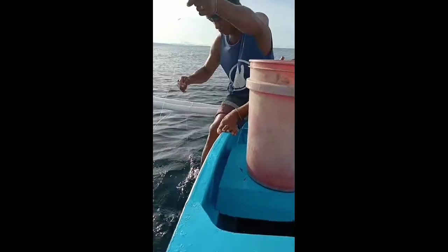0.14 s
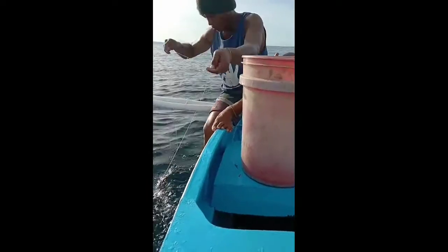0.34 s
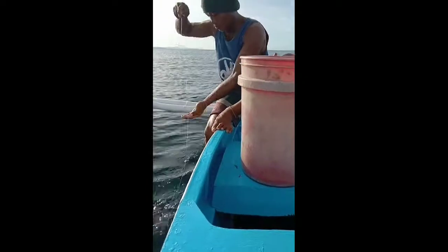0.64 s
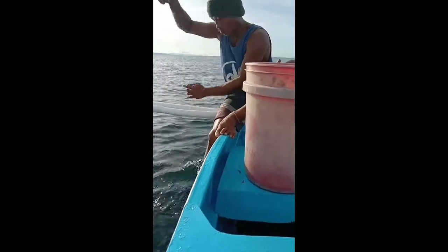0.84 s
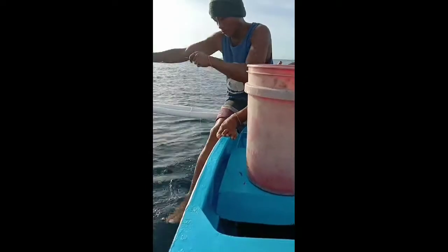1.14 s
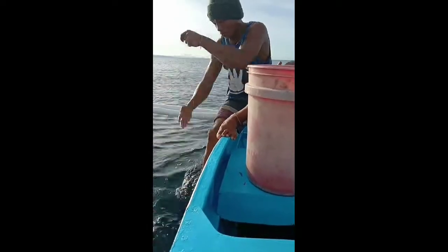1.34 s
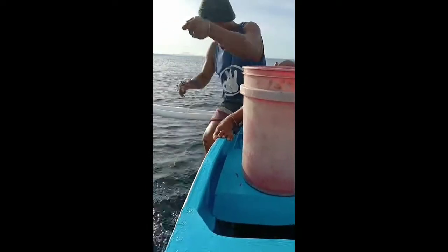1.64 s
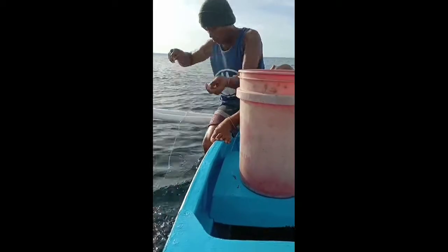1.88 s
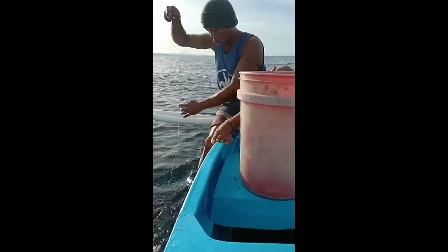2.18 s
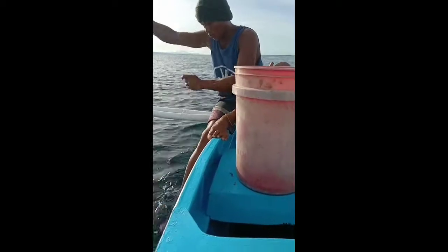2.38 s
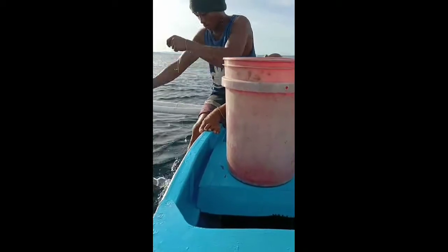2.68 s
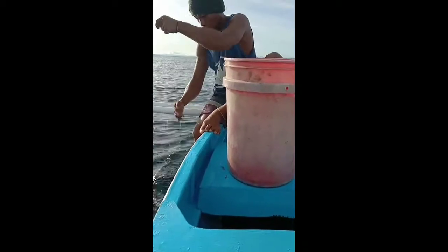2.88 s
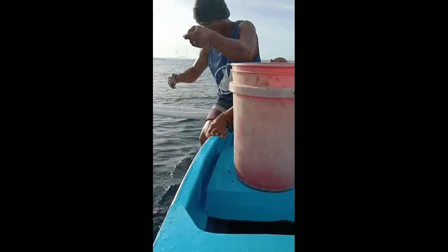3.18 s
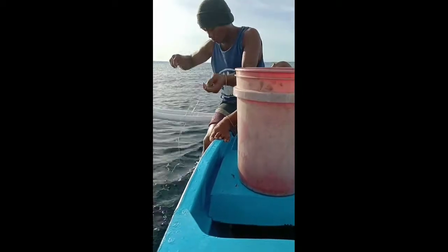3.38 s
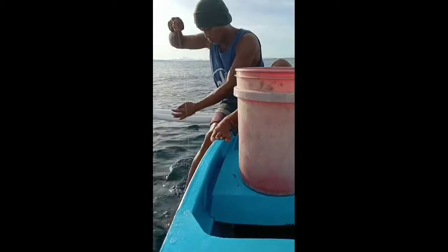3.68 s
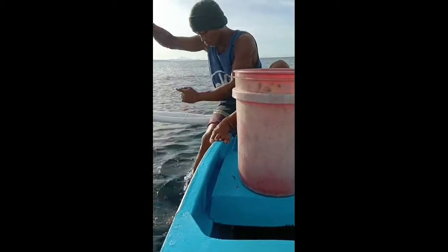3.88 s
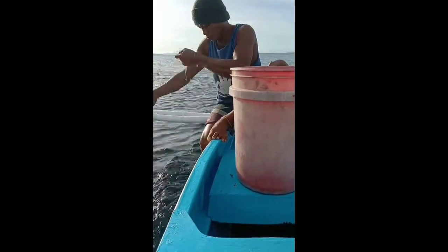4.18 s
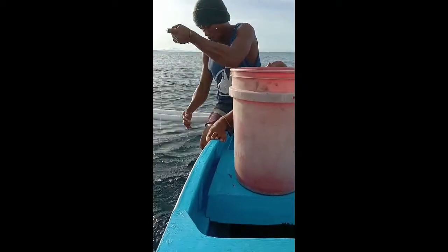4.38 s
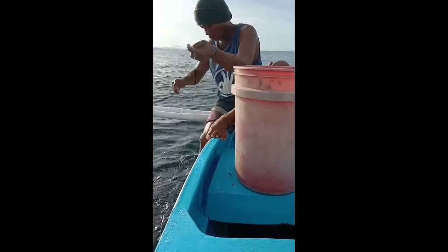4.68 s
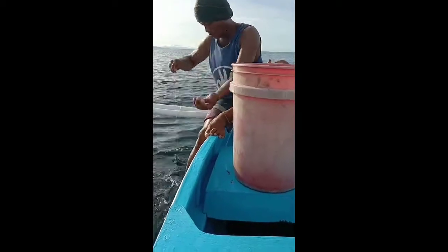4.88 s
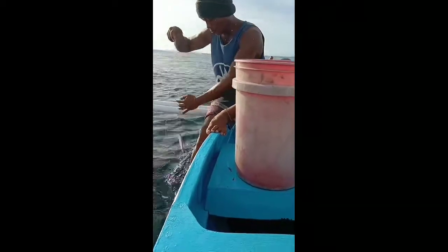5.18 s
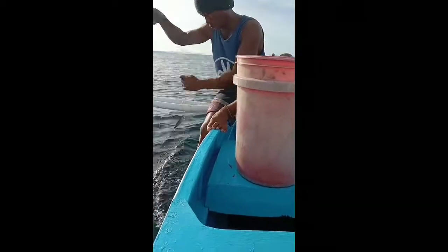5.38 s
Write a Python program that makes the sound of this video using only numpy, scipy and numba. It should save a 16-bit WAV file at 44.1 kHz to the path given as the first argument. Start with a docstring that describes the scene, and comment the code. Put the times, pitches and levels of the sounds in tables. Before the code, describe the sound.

Close on board a small boat in choppy sea. From 0 to 0.45 s come the loudest sounds: deep, round gulps around 200-250 Hz, a volley of wet slaps and a sharp, bright drip near 0.24 s. Low slosh, bubbly wash and fine fizz follow in short irregular surges, with a slap near 0.9 s and several softer, lower gulps from 1.2 to 2 s. A small fluttering glug slides upward near 2.4 s, then strong gulps and slaps cluster at 2.5-2.7 s. Another gulp at 3.0 s leads to a heavy slosh around 3.6 s, then distinct blows at 4.2 and 4.5 s amid quieter wash. A second rising glug comes near 5 s; strong gulps and slaps return from 5.1 s to the end. Tiny ticks and drips dot everything. The hull rings briefly, deck reflections die quickly, and a faint sea rumble continues underneath.

```python
"""A small outrigger boat in a choppy sea, heard from on board: bubble clouds slosh, filtered noise rumbles.
At once come the loudest gulps (swelling, rising sines), slaps (volleys of impacts) and sharp drips (dying sines).
Surges of bubbly wash and fizz (bubbles and flickering noise) and fine ticks (bursts of impacts) follow;
more gulps and slaps come between them. Near 2.4 s and 5 s a glug (fluttering sine) slides up.
Strong gulps return from 5.1 s to the end; hull modes and a short scatter on deck colour the surface sounds."""
import sys
import numpy as np
from scipy import signal
from scipy.fft import rfft, irfft, next_fast_len
from scipy.io import wavfile
from scipy.ndimage import uniform_filter1d
from numba import njit

SR = 44100
rng = np.random.default_rng(int(sys.argv[2]) if len(sys.argv) > 2 else 0)


def materialize(psi):
    """Save the field psi as 16-bit PCM at rate SR to the path in sys.argv[1].

    A 1-D psi becomes a single channel; in a 2-D psi each row is a channel.
    """
    bounded = np.clip(np.atleast_2d(psi).T, -1, 1)
    quanta = np.round(bounded * 32767).astype(np.int16)
    wavfile.write(sys.argv[1], SR, quanta)


N = 243873
TIME_S = np.arange(N) / SR

# Noise and bubble colours. Each row: frequency in Hz, relative level in dB.
SEA_COLOUR = [(25, -43), (100, 62.5), (250, 52), (400, -37.5), (1200, -25), (2500, -64), (4500, -51),
              (8000, -12.5), (15500, -35)]
SLOSH_COLOUR = [(45, -12), (58, -16), (75, -8), (102, 1), (150, -3.5), (220, -4)]
GURGLE_COLOUR = [(230, 14.5), (300, 23.5), (400, -49), (560, 8), (680, -6.5), (830, -12.5)]
WASH_COLOUR = [(500, -30), (580, -8.5), (680, -26.5), (820, -0.5), (960, -8.5), (1180, 0.5), (1600, 3),
               (2050, -3.5), (2500, -1), (2900, -12)]
FIZZ_COLOUR = [(2800, -26.5), (3400, 14.5), (4500, 12), (5800, 1), (7800, 8), (9000, 1), (12000, -10),
               (15500, 7.5)]
SPRAY_COLOUR = [(300, -58), (1000, -18.5), (2000, 2.5), (2600, -5), (4300, 4.5), (6000, -8.5), (7900, -1.5),
                (9500, -19.5), (15500, -23)]
TICK_COLOUR = [(1000, -47), (4000, -4), (8000, -3), (11000, -4.5), (13500, -8), (15500, -4.5)]
KNOCK_COLOUR = [(60, -57.5), (220, 12), (350, 0.5), (450, -9), (570, -1), (700, -13), (850, -0.5),
                (1020, -8.5), (1250, -4.5), (1750, -3.5), (2050, -14), (2500, -7.5), (3200, -19.5),
                (6000, -62)]

# The boat settles into a wave and sloshes. Each row: start in seconds, length in seconds, level in dB.
HEAVES = [(0.0, .44, -27.5), (.63, 0.41, -35.5), (.97, 0.56, -32.5), (1.68, 0.27, -33.5), (2.13, 0.26, -37),
          (2.49, 0.16, -37), (3.06, 0.13, -53.5), (3.36, .17, -37), (3.56, 0.089, -21.5), (3.74, 0.18, -33),
          (4.09, 0.082, -47.5), (4.48, 0.037, -39), (4.65, 0.042, -40), (5.16, 0.18, -25),
          (5.33, 0.15, -34)]
HEAVE_ATTACK_S, HEAVE_SAG_DB_PER_S, HEAVE_RELEASE_DB_PER_S = 0.032, 4, 272

# Water surges along the side. Each row: start in seconds, length in seconds,
# bubbling wash level in dB, fizz level in dB.
SURGES = [(0.143, 0.16, -40.5, -42.5), (0.262, .18, -39.5, -51), (0.582, 0.039, -49.5, -52),
          (0.764, .1, -54, -53.5), (0.859, 0.14, -45, -56.5), (0.953, 0.071, -41.5, -52),
          (1.098, 0.21, -47.5, -54.5), (1.338, 0.14, -46.5, -47.5), (1.523, 0.12, -42.5, -48.5),
          (1.68, 0.23, -49.5, -52), (1.978, 0.021, -45, -46.5), (2.065, 0.35, -48, -52),
          (2.483, 0.42, -46, -53), (2.662, 0.19, -42.5, -42), (2.917, 0.088, -38.5, -46.5),
          (3.042, .18, -46, -53.5), (3.343, 0.032, -41, -50.5), (3.416, 0.24, -44.5, -50.5),
          (3.71, 0.088, -56.5, -56), (3.869, 0.056, -48, -51), (4.001, .15, -52, -51.5),
          (4.171, 0.034, -44, -47), (4.296, 0.045, -56.5, -59), (4.449, 0.1, -57, -59.5),
          (4.604, 0.08, -46.5, -55), (4.742, 0.034, -52, -55), (4.903, 0.18, -55, -57),
          (5.208, 0.2, -63.5, -63)]
SURGE_ATTACK_S, SURGE_RELEASE_DB_PER_S = 0.015, 305
WASH_SAG_DB_PER_S, FIZZ_SAG_DB_PER_S = 5.5, 17.5  # the fine bubbles burst first
CALM_SLOSH_DB, CALM_WASH_DB, CALM_FIZZ_DB = -66.5, -67.5, -65  # between the waves

# Fine drops flicked onto the deck close by. Each row: start in seconds, relative level in dB, t60 in seconds.
TICKS = [(0.149, -31, 0.087), (0.983, -31, 0.018), (1.324, -39, 0.017), (1.855, -29.5, 0.022),
         (2.541, -28.5, 0.025), (2.688, -27.5, 0.037), (2.817, -37, 0.0057), (2.996, -31.5, 0.023),
         (3.35, -34, 0.012), (4.405, -41.5, 0.068), (4.496, -45, .018), (4.769, -25.5, 0.034),
         (4.907, -43.5, 0.016), (5.391, -35, 0.015)]

# Single drips and bubbles. Each row: start in seconds, level before swell and decay in dB, starting pitch in Hz.
DRIPS = [(0.035, -36.5, 1576), (.238, 3, 2410), (.325, -3, 1150), (0.413, -20, 780), (.418, -23.5, 1046),
         (0.435, -28, 1510), (0.458, -24, 1240), (0.635, -34, 1070), (0.734, -29.5, 2650),
         (.768, -31.5, 1273), (1.068, -35, 868), (1.151, -12, 3320), (1.178, -24, 1450),
         (1.339, -5.5, 3320), (1.527, -24, 808), (1.58, -23, 815), (1.731, -20, 2700), (1.807, -27.5, 1133),
         (1.977, -22.5, 1430), (2.179, -35.5, 1090), (2.231, -33, 842), (2.259, -32, 767), (2.6, -15, 3020),
         (2.887, -23, 1270), (2.964, -20, 1105), (2.977, -30, 589), (3.093, -29.5, 780),
         (3.151, -32.5, 2970), (3.232, -30, 1300), (3.328, -33, 590), (3.707, -22.5, 1235),
         (3.841, -21, 797), (4.379, -23, 3980), (4.597, -28, 1290), (4.644, -23.5, 1920),
         (4.757, -33, 1600), (4.83, -37.5, 1430), (5.016, -33, 1166), (5.33, -29.5, 2065),
         (5.371, -36, 1310), (5.423, -24, 1880)]
TYPICAL_DRIP_DB, TYPICAL_DRIP_HZ, TYPICAL_DRIP_T60_S = -23, 1200, 0.029
LOUD_SHORTENS_EXPONENT, HIGH_SHORTENS_EXPONENT = 0.66, 0.55
DRIP_CLIMB = 0.18  # share of the starting pitch

# Cavities closing. Each row: start in seconds, level before swell and decay in dB, starting pitch in Hz.
GLUGS = [(2.368, -29.5, 295), (4.961, -31, 316)]
GLUG_T60_S, GLUG_CLIMB, GLUG_FLUTTER_DB = 0.13, 1.2, 3.5

# Wavelets hitting the side. Each row: time in seconds, knock level in dB, relative spray level in dB,
# pitch of the air caught in the blow in Hz.
SLAPS = [(0.082, -21.5, -35.5, 690), (0.148, -23.5, -29.5, 527), (.174, -32, -36, 2380),
         (0.208, -27.5, -41, 790), (0.254, -24.5, -31.5, 1100), (0.296, -31.5, -35.5, 2260),
         (.322, -38, -45, 1210), (0.462, -60, -43.5, 1230), (0.596, -39, -42.5, 1060),
         (0.725, -44.5, -43.5, 2590), (0.853, -37, -36.5, 2240), (0.89, -22, -36.5, 850),
         (0.984, -30.5, -41, 1190), (1.092, -32.5, -40, 1900), (1.161, -31, -32, 1310),
         (1.344, -65, -27, 2690), (1.431, -28, -30, 1640), (1.577, -61, -40.5, 820),
         (1.654, -35.5, -40.5, 2760), (1.854, -27, -36, 800), (1.961, -36, -46, 755),
         (2.163, -36, -50, 865), (2.477, -20.5, -41, 635), (2.601, -25.5, -34, 1550),
         (2.675, -18, -31.5, 625), (2.738, -40, -38, 1090), (3.33, -34, -42, 550), (3.345, -27.5, -50, 527),
         (3.589, -23.5, -34.5, 1130), (3.612, -40, -49, 1640), (3.633, -28.5, -36.5, 1200),
         (3.837, -36, -43.5, 770), (4.195, -20.5, -37, 580), (4.444, -30.5, -46, 810),
         (4.476, -45, -37.5, 790), (4.491, -22.5, -33, 1180), (4.606, -32, -47, 1750),
         (4.64, -61, -40.5, 1970), (4.767, -37.5, -34.5, 816), (4.779, -29, -56, 870),
         (5.045, -45, -39.5, 1320), (5.08, -25.5, -42, 815), (5.151, -22, -31, 1070),
         (5.203, -39, -44.5, 800), (5.245, -26.5, -42.5, 616), (5.314, -33, -43.5, 905),
         (5.392, -20.5, -29.5, 830)]
SLAP_T60_S = 0.039

# Air pockets trapped under the hull. Each row: time of the peak in seconds, peak level in dB,
# pitch at the peak in Hz, t60 in seconds.
GULPS = [(0.093, -3.5, 250, 0.024), (.158, -12, 225.6, 0.057), (0.226, -17, 188.5, 0.11),
         (.268, -11, 234, 0.022), (0.306, -12, 239, 0.032), (0.597, -28.5, 250, .05),
         (0.858, -28.5, 245, 0.063), (0.899, -18, 202, 0.055), (1.102, -22, 267, 0.075),
         (1.127, -21, 262, 0.026), (1.245, -17.5, 122, 0.017), (1.314, -20, 140.5, 0.088),
         (1.381, -18, 110, 0.04), (1.406, -22, 201, 0.023), (1.437, -23.5, 218, 0.023),
         (1.499, -21.5, 113, 0.036), (1.54, -26.5, 127, 0.1), (1.642, -28, 244, 0.05),
         (1.697, -22.5, 227, 0.0083), (1.764, -20.5, 214.5, 0.057), (1.806, -26.5, 225, 0.094),
         (1.863, -17.5, 261, .071), (1.919, -19.5, 227, 0.09), (1.957, -23.5, 235, 0.059),
         (2.169, -27.5, 257, .06), (2.363, -19.5, 227, 0.023), (2.486, -10.5, 203.5, 0.062),
         (2.618, -12.5, 239.6, 0.061), (2.663, -12.5, 222, 0.042), (2.685, -23.5, 294, 0.044),
         (2.747, -22.5, 248, .046), (3.015, -13.5, 240, 0.04), (3.233, -20, 249.4, 0.074),
         (3.359, -13, 195, .04), (3.47, -19, 142.5, 0.023), (3.54, -17.5, 176, 0.017),
         (3.592, -10, 240.6, 0.054), (3.624, -27, 188, 0.091), (3.684, -20, 203, 0.067),
         (3.855, -23.5, 128, 0.22), (3.88, -18.5, 212, 0.015), (4.096, -29.5, 183, 0.07),
         (4.129, -25.5, 225, 0.026), (4.202, -9, 222, 0.011), (4.466, -21, 243, 0.082),
         (4.494, -12.5, 191, 0.1), (4.541, -24, 193, 0.08), (4.616, -30, 172, 0.45),
         (4.665, -20, 238, 0.038), (4.785, -18.5, 248, 0.036), (5.051, -30.5, 223, 0.18),
         (5.084, -25.5, 255, 0.058), (5.161, -15, 230.6, 0.086), (5.213, -10.5, 238, 0.037),
         (5.236, -19.5, 223.6, 0.21), (5.266, -11.5, 141, 0.046), (5.323, -17.5, 223, 0.01),
         (5.397, -15, 216, 0.048)]
GULP_SWELL_CYCLES = 1.02
STIR_BELOW_GULP_DB, STIR_RELEASE_DB_PER_S = -28, 167.5  # a gulp stirs the water as well

# Ring of the hull and deck. Each row: frequency in Hz, relative level in dB, t60 in seconds.
HULL_MODES = [(553, -5.5, 0.041), (629, -16, 0.026), (829, -13.5, 0.091), (821, -37, .06),
              (1172, -13.5, 0.035), (1241, -10, 0.038), (1570, -18, 0.069), (2400, -5, 0.022),
              (2560, -6.5, 0.028), (3300, -14, 0.014), (4510, -8, 0.021), (7950, -5.5, 0.01)]


def from_db(db):
    """Amplitude of a level in dB."""
    return 10 ** (np.asarray(db) / 20)


def rms_one(x):
    """Scales a signal to rms 1."""
    return x / np.sqrt(np.mean(x ** 2) + 1e-20)


def colour_db(colour, hz):
    """Reads a colour on a log-frequency axis."""
    points_hz, points_db = np.array(colour).T
    return np.interp(np.log(hz + 1e-3), np.log(points_hz), points_db)


def coloured(x, colour):
    """Shapes a spectrum by a colour; rms 1."""
    size = next_fast_len(N)
    bins_hz = np.arange(size // 2 + 1) * SR / size
    spectrum = rfft(x, size) * from_db(colour_db(colour, bins_hz))
    return rms_one(irfft(spectrum, size)[:N])


def evened(x, span_s):
    """Holds the slow level of a texture at 1."""
    size = max(int(span_s * SR), 1)
    power = uniform_filter1d(uniform_filter1d(x ** 2, size), size)
    return x / np.sqrt(np.abs(power) + 1e-12)


def drift(per_s):
    """Random wavering between knots; rms 1."""
    knots = rng.standard_normal(int(N / SR * per_s) + 2)
    return rms_one(np.interp(TIME_S * per_s, np.arange(len(knots)), knots))


def swells(rows, attack_s, sag_db_per_s, release_db_per_s, calm_db):
    """Each push of water builds up, sags while it lasts, then dies away to the calm level; powers add."""
    power = from_db(calm_db) ** 2
    for start_s, length_s, db in rows:
        t = TIME_S - start_s
        sag_db = sag_db_per_s * np.maximum(t, 0)
        fall_db = sag_db + release_db_per_s * np.maximum(t - length_s, 0)
        build_up = 1 / (1 + (np.minimum(t, 0) / attack_s) ** 4)
        power = power + (from_db(db - np.minimum(fall_db, 100)) * build_up) ** 2
    return np.sqrt(power)


def droplets(per_s, spread_db):
    """Random impacts of very uneven size and either sign; rms 1."""
    sizes = from_db(spread_db * np.minimum(rng.exponential(1, N), 4)) * rng.choice([-1, 1], N)
    return rms_one(sizes * (rng.random(N) < per_s / SR))


def ring(x, hz, t60_s):
    """One resonant mode; it passes white noise at unchanged level."""
    radius = from_db(-60 / (t60_s * SR))
    angle = 2 * np.pi * hz / SR
    gain = np.sqrt((1 - radius * radius) / 2)
    poles = [1, -2 * radius * np.cos(angle), radius * radius]
    return signal.lfilter(gain * np.array([1, 0, -1]), poles, x + 1e-18)


@njit
def bubble_sum(start_s, height, hz, t60_s, climb, out_size, sr):
    """Dying sines that swell within a cycle or two and climb in pitch as each bubble nears the surface."""
    out = np.zeros(out_size)
    for k in range(len(start_s)):
        first, length = int(start_s[k] * sr), int(t60_s[k] * sr)
        level, phase, fade = height[k], 0.0, 1000.0 ** (-1.0 / length)
        for i in range(min(length, out_size - first)):
            phase += 2 * np.pi * hz[k] * (1 + climb[k] * i / length) / sr
            level *= fade
            out[first + i] += level * np.sin(phase) * phase ** 2 / (phase ** 2 + 40)
    return out


def bubble_cloud(colour, cycles, spread_db, climb, count):
    """Bubbles born at random, with pitches spread over a colour; rms 1."""
    when, pitch, size, life, climb_share = rng.random((count, 5)).T
    low_hz, high_hz = colour[0][0], colour[-1][0]
    hz = low_hz * (high_hz / low_hz) ** pitch
    size_db = spread_db * np.minimum(-np.log(1 - size), 3.5)
    height = from_db(colour_db(colour, hz) + size_db) * np.sqrt(hz)
    t60_s = cycles * 2 ** (2 * life - 1) / hz  # half to twice the cycles
    return rms_one(bubble_sum(when * N / SR, height, hz, t60_s, climb * climb_share, N, SR))


def froth(colour, patchy_db, flicker_per_s, count):
    """Countless tiny bubbles burst in clusters: noise bands flare partly together, partly on their own."""
    edges_hz = np.geomspace(colour[0][0], colour[-1][0], count + 1)
    white = rng.standard_normal((2, N))
    together = drift(flicker_per_s)
    out = np.zeros(N)
    for k, (low_hz, high_hz) in enumerate(zip(edges_hz, edges_hz[1:])):
        sos = signal.butter(2, [low_hz, high_hz], "band", fs=SR, output="sos")
        band = signal.sosfilt(sos, white[k % 2])
        flare = drift(flicker_per_s) + 0.92 * together
        out += band * from_db(colour_db(colour, np.sqrt(low_hz * high_hz)) + patchy_db * flare)
    return rms_one(out)


def open_sea(sea_db=-66):
    """The waves all round: steady noise, mostly a low rumble."""
    return from_db(sea_db) * coloured(rng.standard_normal(N), SEA_COLOUR)


def gulp_stir():
    """Level of the water stirred by each gulp; it jumps up and fades until a stronger one."""
    stirs_db = np.full(N, -200.)
    for peak_s, db, _, _ in GULPS:
        stirs_db[int(peak_s * SR)] = db + STIR_BELOW_GULP_DB
    fade_db = STIR_RELEASE_DB_PER_S * TIME_S
    held_db = np.maximum.accumulate(stirs_db + fade_db) - fade_db
    return uniform_filter1d(from_db(held_db), size=600)


def slosh(flow, gurgle_db=-8.5):
    """Big slow pockets of air wobble under the boat; where they meet the wash, the water gurgles."""
    pockets = bubble_cloud(SLOSH_COLOUR, cycles=8.4, spread_db=1.5, climb=0.25, count=900)
    pockets = signal.sosfilt(signal.butter(3, [48, 270], "band", fs=SR, output="sos"), pockets)
    heave = swells(HEAVES, HEAVE_ATTACK_S, HEAVE_SAG_DB_PER_S, HEAVE_RELEASE_DB_PER_S, CALM_SLOSH_DB)
    heave = np.hypot(heave, gulp_stir())
    gurgle = evened(bubble_cloud(GURGLE_COLOUR, cycles=35, spread_db=10.0, climb=0.087, count=1200), 0.12)
    meeting = np.sqrt(heave * flow)
    return heave * evened(pockets, 0.024) + from_db(gurgle_db) * meeting * gurgle


def wash(flow, froth_db=-1.5):
    """Bubbles and froth run along the side and follow the flow."""
    water = bubble_cloud(WASH_COLOUR, cycles=47, spread_db=6.0, climb=0.073, count=6500)
    water += from_db(froth_db) * froth(WASH_COLOUR, patchy_db=6.0, flicker_per_s=50, count=12)
    return flow * evened(water, 0.075)


def fizz(froth_db=-1, patter_db=-10):
    """Fine bubbles burst and spray patters back on the surface."""
    water = bubble_cloud(FIZZ_COLOUR, cycles=50, spread_db=7.0, climb=0.015, count=5500)
    water += from_db(froth_db) * froth(FIZZ_COLOUR, patchy_db=5.0, flicker_per_s=75, count=11)
    patter = droplets(20000, 1.7) * from_db(10 * drift(80))
    water += from_db(patter_db) * coloured(patter, SPRAY_COLOUR)
    bursts = [(start_s, length_s, db) for start_s, length_s, _, db in SURGES]
    level = swells(bursts, SURGE_ATTACK_S, FIZZ_SAG_DB_PER_S, SURGE_RELEASE_DB_PER_S, CALM_FIZZ_DB)
    return level * evened(water, 0.085)


def ticks(tick_db=-3):
    """A fine drop shatters in a short, bright spit of impacts."""
    fading = np.zeros(N)
    for start_s, db, t60_s in TICKS:
        span = slice(int(start_s * SR), int((start_s + .1) * SR))
        fading[span] += from_db(db + tick_db - 60 * (TIME_S[span] - start_s) / t60_s)
    return fading * evened(coloured(droplets(6200, 1.8), TICK_COLOUR), .004)


def drips():
    """Larger single bubbles ring clear of the wash; louder and higher ones are spent sooner."""
    start_s, db, hz = np.array(DRIPS, float).T
    loud_factor = from_db(TYPICAL_DRIP_DB - db) ** LOUD_SHORTENS_EXPONENT
    high_factor = (TYPICAL_DRIP_HZ / hz) ** HIGH_SHORTENS_EXPONENT
    t60_s = TYPICAL_DRIP_T60_S * loud_factor * high_factor
    return bubble_sum(start_s, from_db(db), hz, t60_s, np.full(len(hz), DRIP_CLIMB), N, SR)


def glugs():
    """A cavity beside the hull fills with water, so its note flutters in level and slides up."""
    start_s, db, hz = np.array(GLUGS, float).T
    t60_s, climb = np.full(len(hz), GLUG_T60_S), np.full(len(hz), GLUG_CLIMB)
    notes = bubble_sum(start_s, from_db(db), hz, t60_s, climb, N, SR)
    return notes * from_db(GLUG_FLUTTER_DB * drift(170))


def slap_shape(t, attack_s=0.0018, lead_db=-21, lead_s=0.0079, trail_db=-17, trail_t60_s=0.11):
    """Level of one slap: a first touch, the blow, a splashy trail."""
    after = np.maximum(t, 0)
    decay = from_db(-60 * after / SLAP_T60_S)
    trail = from_db(trail_db - 60 * after / trail_t60_s)
    touch = from_db(lead_db) * np.exp(-np.abs(t) / lead_s)
    return np.minimum(after / attack_s, 1) * (decay + trail) + touch


def slaps(spray_db=1, froth_db=1, air_db=-5, air_cycles=8):
    """A dense volley of impacts on the side; the blow rings the air caught in it and throws spray."""
    out = np.zeros(N)
    knocks = evened(coloured(droplets(3000, 3.5), KNOCK_COLOUR), 0.0041)
    spray = coloured(droplets(3000, 2.7), SPRAY_COLOUR)
    spray += from_db(froth_db) * froth(SPRAY_COLOUR, patchy_db=11.0, flicker_per_s=130, count=14)
    spray = evened(spray, 0.019)
    for slap_s, knock_db, splash_db, air_hz in SLAPS:
        span = slice(max(int((slap_s - .03) * SR), 0), int((slap_s + .25) * SR))
        shape = slap_shape(TIME_S[span] - slap_s)
        thud = from_db(knock_db) * shape * knocks[span]
        air = from_db(air_db) * np.std(thud) * rms_one(ring(thud, air_hz, air_cycles / air_hz))
        out[span] += thud + air + from_db(splash_db + spray_db) * shape * spray[span]
    return out


def gulps(rise_per_s=6.04, boom_db=-19, boom_t60_s=0.18):
    """A squeezed air pocket swells, throbs a few times and climbs in pitch as it shrinks."""
    out = np.zeros(N)
    for peak_s, db, hz, t60_s in GULPS:
        swell_s = GULP_SWELL_CYCLES / hz
        span = slice(max(int((peak_s - 3 * swell_s) * SR), 0), int((peak_s + .2) * SR))
        t = TIME_S[span] - peak_s
        decay = from_db(-60 * (np.hypot(t, .003) - .003) / t60_s)  # rounded top
        shape = np.where(t < 0, np.exp(-(t / swell_s) ** 2), decay)
        pitch_hz = hz * (1 + rise_per_s * np.clip(t, -.02, .02))
        phase = 2 * np.pi * np.cumsum(pitch_hz) / SR
        out[span] += from_db(db) * shape * np.sin(phase - phase[np.argmax(shape)])
    # the hollow of the boat booms on after each one
    hollow = sum(ring(out, hz, boom_t60_s) for hz in (104, 188, 256))
    return out + from_db(boom_db) * np.std(out) * rms_one(hollow)


def hull(x, ring_db=-19):
    """The thin shell of the boat rings with whatever the water does to it."""
    modes = sum(from_db(db) * ring(x, hz, t60_s) for hz, db, t60_s in HULL_MODES)
    return x + from_db(ring_db) * modes


def deck(x, echo_db=-11, t60_s=0.097):
    """Sound scatters between the deck, the gunwale and the sea surface and dies quickly."""
    t = TIME_S[:int(.12 * SR)]
    sparse = rng.standard_normal(len(t)) * (rng.random(len(t)) < 2500 / SR)
    echoes = sparse * (t > .002) * from_db(-60 * t / t60_s)
    echoes /= np.sqrt(np.sum(echoes ** 2))
    return x + from_db(echo_db) * signal.fftconvolve(x, echoes)[:N]


def scene():
    """Sounds at the surface ring the hull and scatter on deck; the deep sounds come from below."""
    pushes = [row[:3] for row in SURGES]
    flow = swells(pushes, SURGE_ATTACK_S, WASH_SAG_DB_PER_S, SURGE_RELEASE_DB_PER_S, CALM_WASH_DB)
    surface = wash(flow) + fizz() + ticks() + drips() + glugs() + slaps()
    deep = open_sea() + slosh(flow) + gulps()
    return (deck(hull(surface)) + deep)[None]


def record(dry, dip_hz=10400, dip_width_hz=3200, dip_db=-15, cutoff_hz=15900):
    """The microphone port has a hollow in the treble; the top is cut."""
    edges_hz = [dip_hz - dip_width_hz / 2, dip_hz + dip_width_hz / 2]
    notched = signal.sosfilt(signal.butter(1, edges_hz, "bandstop", fs=SR, output="sos"), dry)
    heard = notched + from_db(dip_db) * (dry - notched)
    return signal.sosfilt(signal.ellip(10, .3, 70, cutoff_hz, fs=SR, output="sos"), heard)


dry = scene()
out = record(dry)
materialize(out)
```